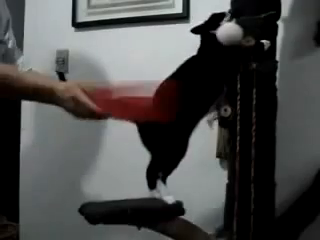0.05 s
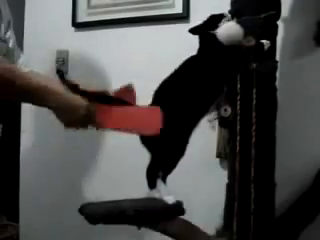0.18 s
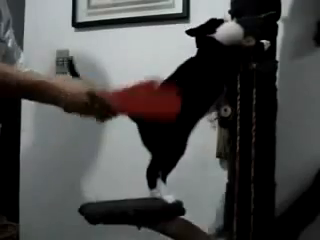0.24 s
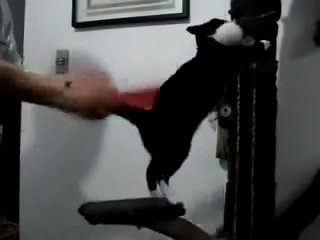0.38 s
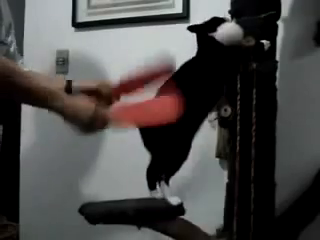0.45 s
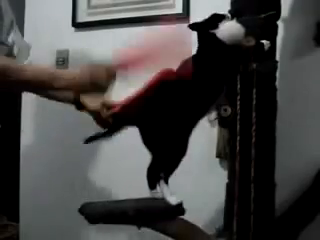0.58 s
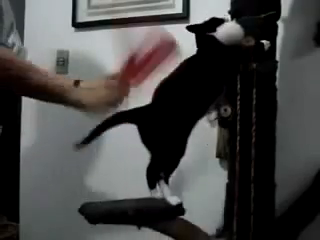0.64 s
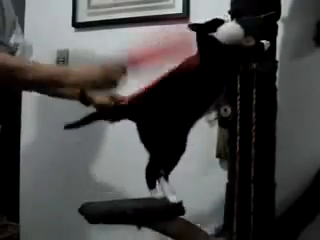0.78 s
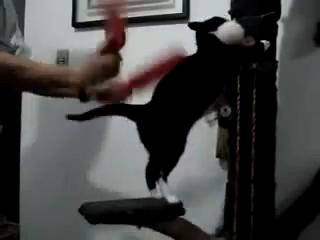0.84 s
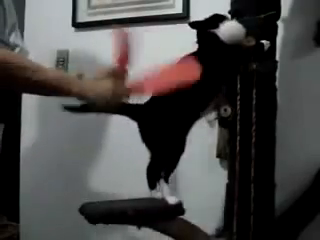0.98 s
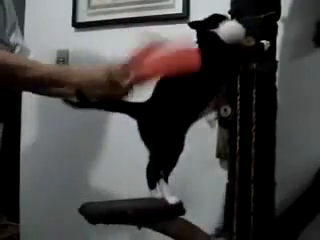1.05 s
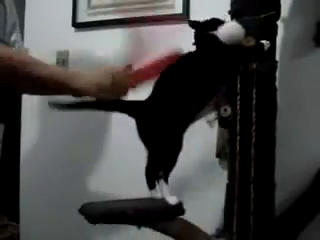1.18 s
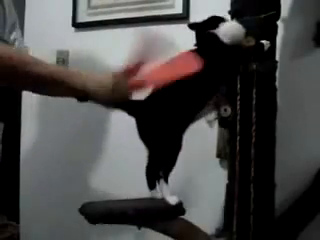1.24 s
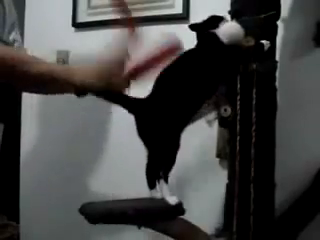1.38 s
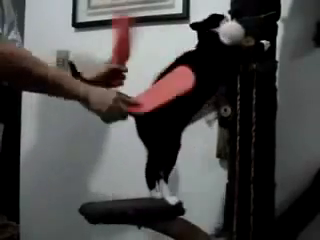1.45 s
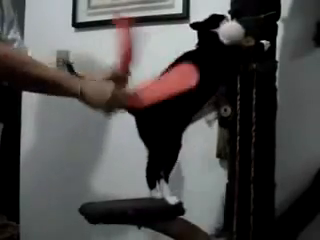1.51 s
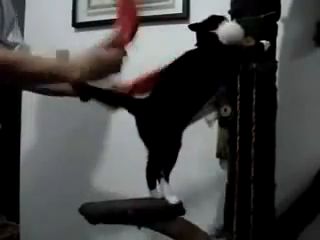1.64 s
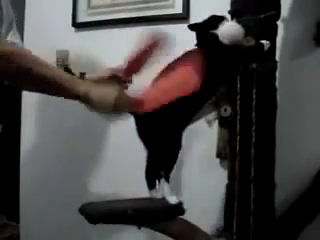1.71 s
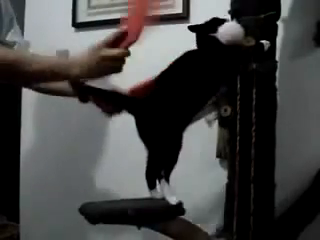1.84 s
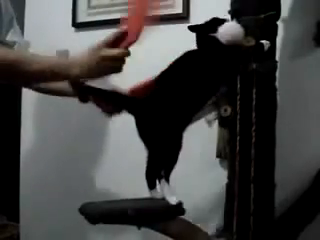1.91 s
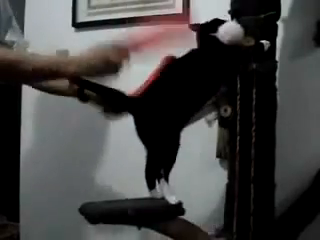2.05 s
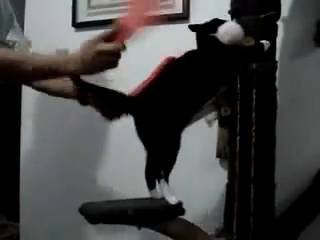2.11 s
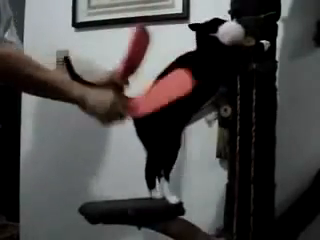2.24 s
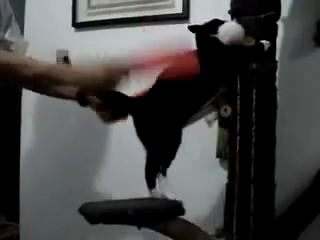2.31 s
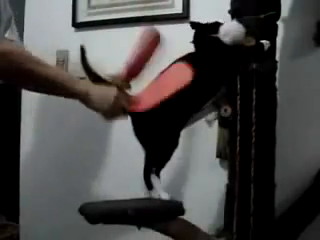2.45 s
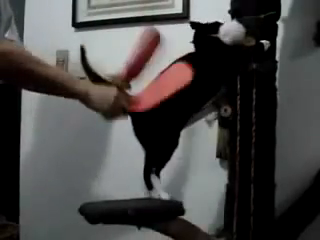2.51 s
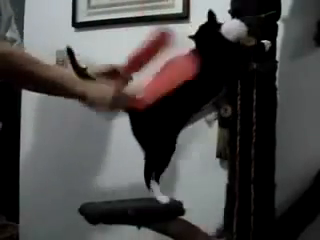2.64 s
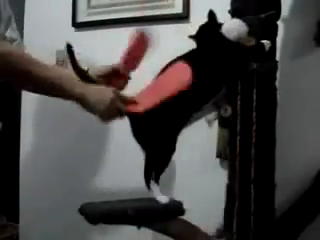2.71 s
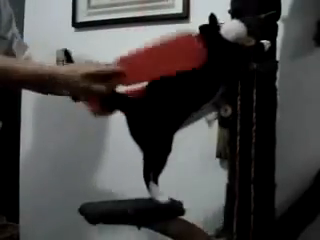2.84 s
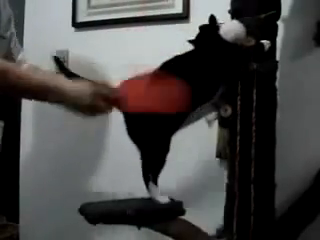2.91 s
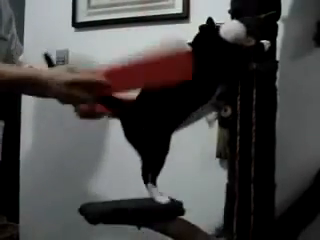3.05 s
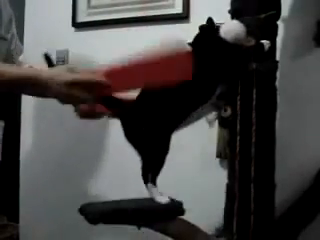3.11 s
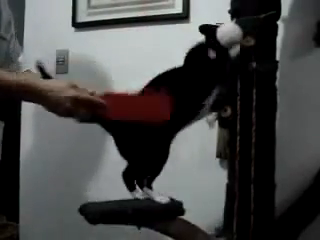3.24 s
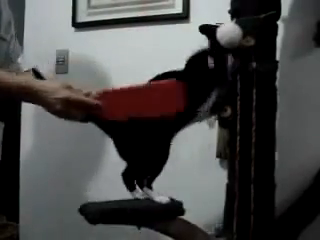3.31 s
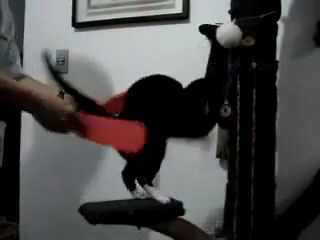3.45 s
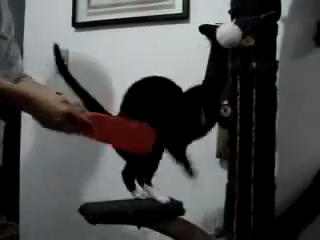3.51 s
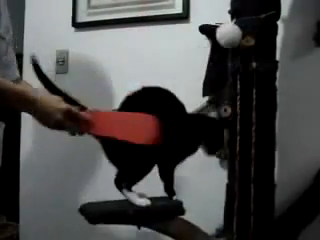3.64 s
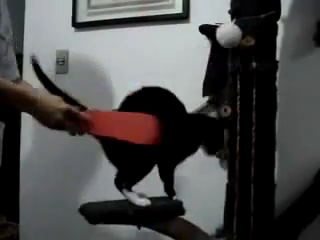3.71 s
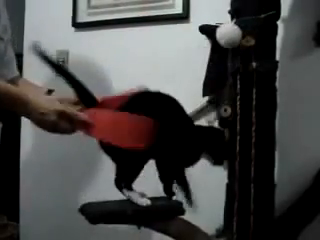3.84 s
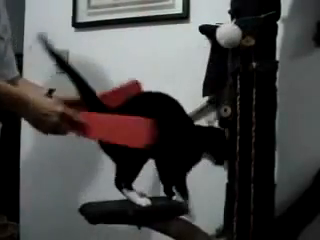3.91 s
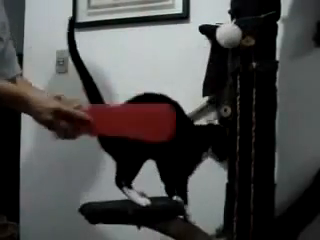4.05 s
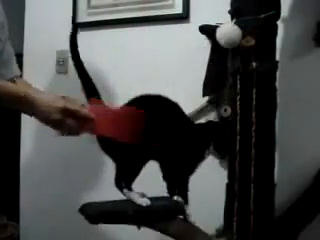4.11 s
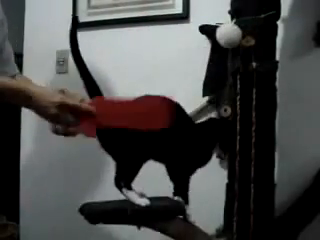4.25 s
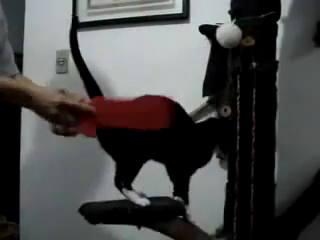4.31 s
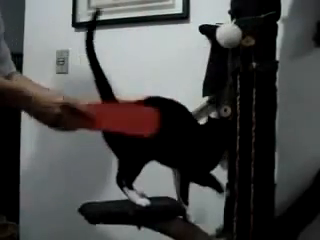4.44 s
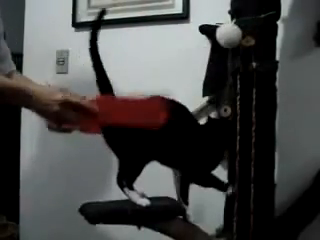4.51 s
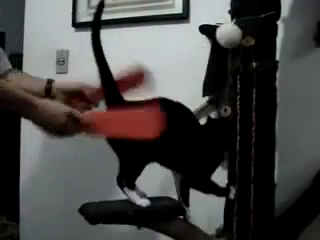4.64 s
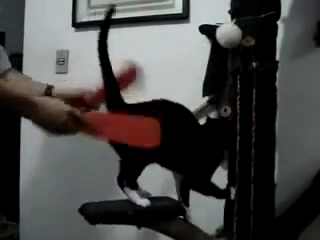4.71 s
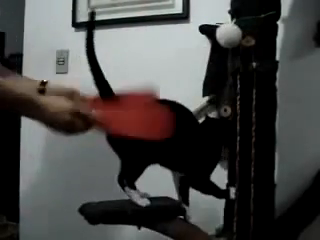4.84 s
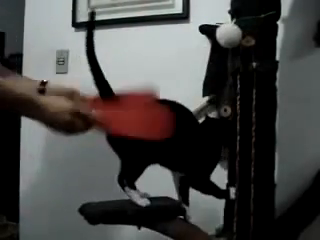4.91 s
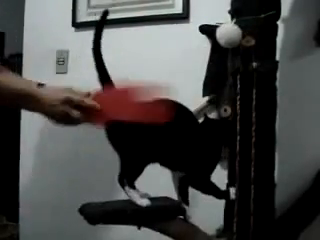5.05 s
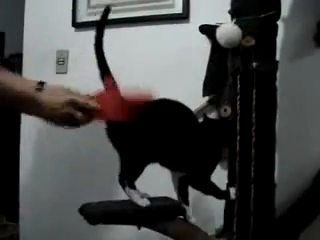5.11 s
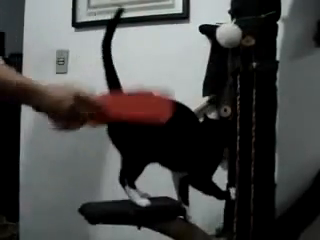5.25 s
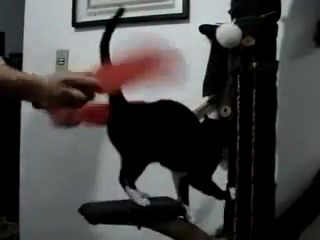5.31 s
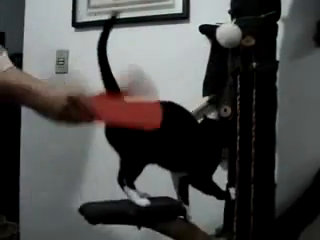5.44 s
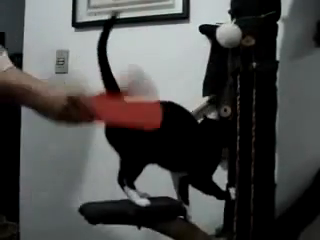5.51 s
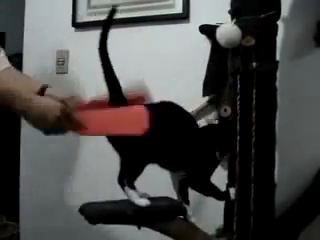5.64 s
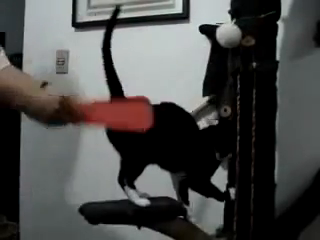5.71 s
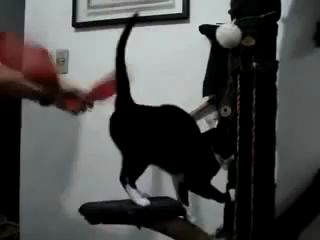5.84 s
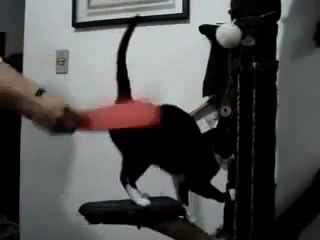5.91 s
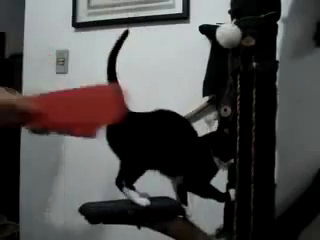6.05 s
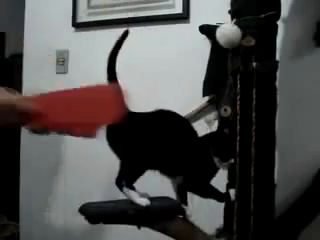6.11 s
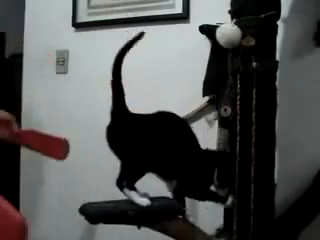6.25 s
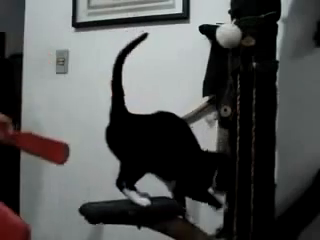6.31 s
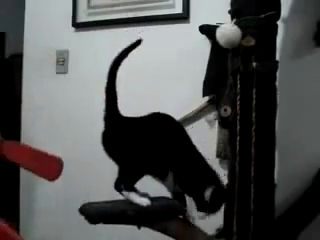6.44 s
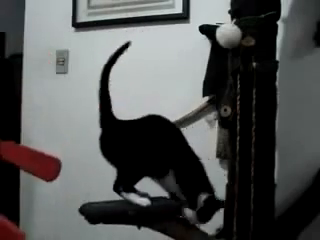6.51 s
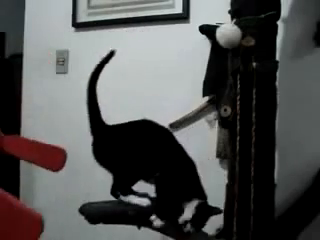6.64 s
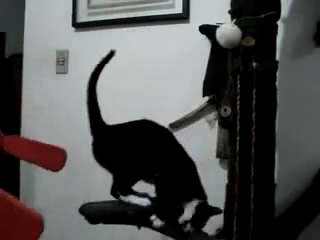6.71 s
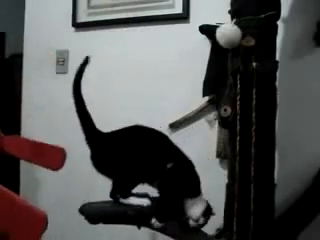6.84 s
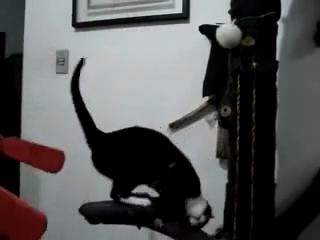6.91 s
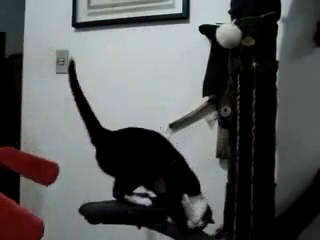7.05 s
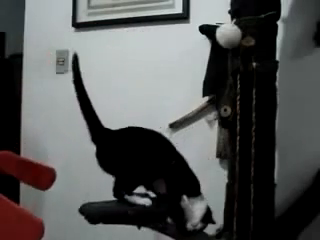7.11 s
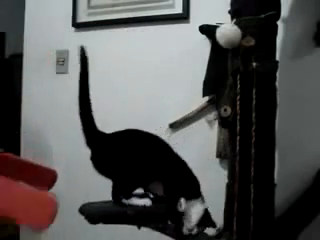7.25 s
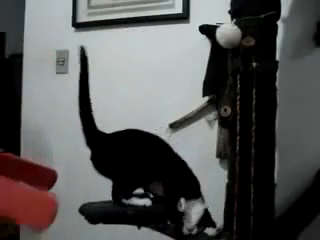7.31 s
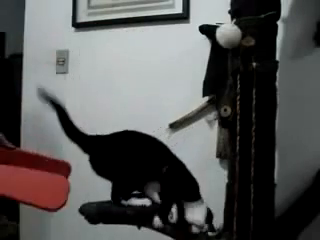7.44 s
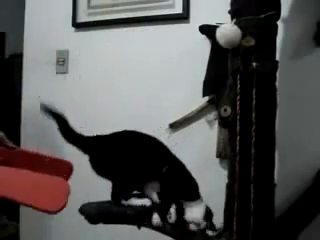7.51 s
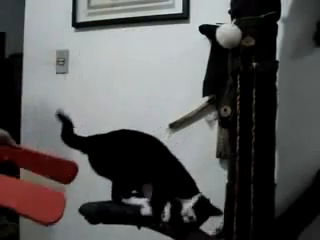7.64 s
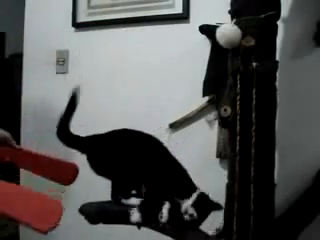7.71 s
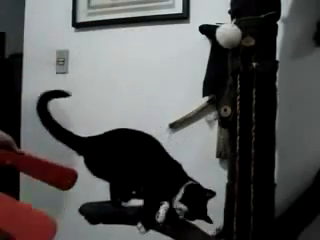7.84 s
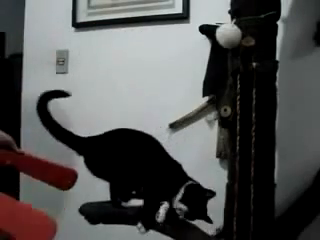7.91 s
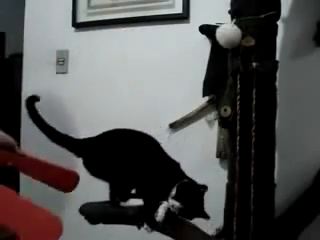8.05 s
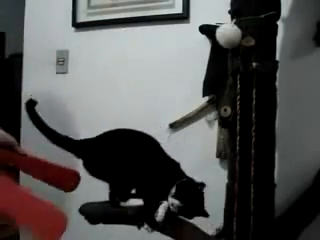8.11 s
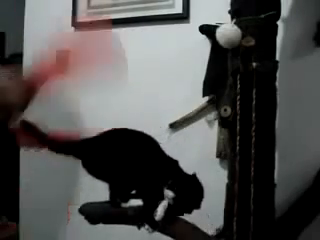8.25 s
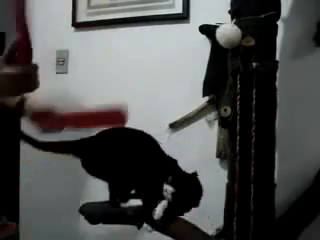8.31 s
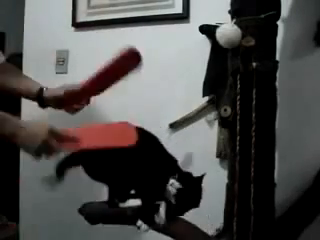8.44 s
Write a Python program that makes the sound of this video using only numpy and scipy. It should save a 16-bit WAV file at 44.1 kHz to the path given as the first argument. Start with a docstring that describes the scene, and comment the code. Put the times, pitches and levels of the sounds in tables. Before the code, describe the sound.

Soft slippers slap fur about four times a second indoors; they stop and a cat meows quietly twice.

```python
"""Slaps of two soft slippers on a cat's rump, about four beats a second, in a small bare room.
One hand slaps firmly; the other often follows with a lighter pat. Each blow is a pressure pulse,
coloured by trapped air; the room rings. Then two quiet wavering meows (harmonics shaped by throat
and mouth) and paws shifting on a perch. Peaks are limited; the sound is almost all in the left channel."""
import sys
import numpy as np
from scipy import signal
from scipy.fft import rfft, irfft
from scipy.io import wavfile
from scipy.ndimage import uniform_filter1d, minimum_filter1d

SR = 44100
rng = np.random.default_rng(int(sys.argv[2]) if len(sys.argv) > 2 else 0)


def dump_mix(stems):
    """Bounce the given channels to the path in sys.argv[1] as a 16-bit WAV at rate SR."""
    frames = np.atleast_2d(stems).T  # one column per channel
    limited = np.clip(frames, -1, 1)  # hard clip at full scale
    pcm = np.round(limited * 32767).astype(np.int16)
    wavfile.write(sys.argv[1], SR, pcm)


N = 373527
TIME_S = np.arange(N) / SR

# Table levels are relative. Background spectrum: f/Hz, level/dB
BACKGROUND_SPECTRUM = [(40, -24), (120, -16), (300, -4), (800, 0.5), (2800, -6.5), (4000, -9.5),
                       (9500, -23.5)]
# Wall and ceiling echoes: delay/s, level/dB
WALL_ECHOES = [(0.0138, -16), (0.0182, -13), (0.021, -15), (0.029, -20), (0.035, -7), (0.064, -16)]
# Room standing waves: f/Hz, level/dB, T60/s
STANDING_WAVES = [(246.3, -29.5, 0.69), (316.5, -19.5, 0.29), (389, -17, 0.44), (619, -21.5, 0.38),
                  (740, -37, 0.36), (906, -29.5, 0.38), (2032, -23, 0.17), (2676, -19.5, 0.1)]
# Diffuse tail spectrum: f/Hz, level/dB
TAIL_SPECTRUM = [(50, -3), (220, -1), (550, 4.5), (1000, 3.5), (2600, 5), (9000, 1.5)]
# Diffuse tail decay: f/Hz, T60/s
TAIL_DECAY = [(100, 0.83), (500, 0.41), (2000, 0.34), (6000, 0.34)]
# Paws on the perch: t/s, level/dB, length/s
PAW_SCUFFS = [(8.056, -69.5, 0.027), (8.162, -75, 0.042), (8.361, -72.5, 0.0088), (8.382, -76, 0.036)]
# Throat and mouth response: f/Hz, level/dB
VOCAL_TRACT = [(700, 1.5), (1050, 1.5), (1350, -4.5), (1600, -1.5), (1850, -5.5), (2700, -15),
               (3200, -18.5), (3800, -26), (4500, -32), (5400, -23.5), (6400, -24), (7200, -34.5),
               (9000, -65)]
# One curve per meow: t/s, pitch/Hz, level/dB, low formant/dB, high formant/dB
MEOW_CURVES = [
    [(6.546, 408, -78, -3, -11), (6.662, 508, -67, 4, -14), (6.678, 573.4, -59, 12, 9),
     (6.84, 491, -66, 6.5, 10.5), (6.92, 502, -65, 13.5, 2.5), (7.015, 513.2, -64.5, 26, -12),
     (7.1, 458, -66.5, 6, -10), (7.2, 366, -74.5, -2, -3)],
    [(7.23, 364.6, -80, 2, -3), (7.35, 408.6, -70, -4, 0), (7.43, 452.4, -64.5, 10.5, 11.5),
     (7.52, 452.4, -65.5, 18.5, 11), (7.625, 421.4, -78.5, 0, -5), (7.69, 454.4, -67, 8, -17),
     (7.8, 512, -63.5, 1, -5), (7.89, 534.8, -56.5, 13, -1), (7.96, 520.4, -67.5, 9, -2),
     (8.045, 491, -67.5, 8, -4), (8.085, 390, -70, 3, -3)],
]
# Sole landing on fur: f/Hz, level/dB
SOLE_SPECTRUM = [(60, -42.5), (200, -17), (350, -10), (620, -3.5), (900, -0.5), (1500, -6), (2600, -22),
                 (4300, -31.5), (9500, -54.5)]
# Second hand: t/s, level/dB
LIGHT_PATS = [(0.141, -40), (0.428, -43), (1.193, -39.5), (1.43, -43), (1.687, -43), (1.929, -43),
              (2.188, -39), (2.917, -40), (3.147, -40), (3.645, -46.5), (4.162, -50.5), (4.391, -49),
              (4.608, -47), (4.89, -44.5), (5.136, -45), (5.373, -46), (5.629, -42), (6.022, -38.5)]
# Leading hand: t/s, level/dB, crack before weighting/dB, trapped-air pop/Hz
FIRM_SLAPS = [(0.042, -32.5, 11, 650), (0.301, -33, 4.5, 930), (0.573, -32.5, 7.5, 835),
              (0.829, -36, 1.5, 1020), (1.073, -34, 2, 724), (1.334, -33.5, -4, 710),
              (1.579, -31.5, 1, 780), (1.835, -31.5, -2.5, 1250), (2.079, -32, 1, 770),
              (2.335, -29, -0.5, 770), (2.574, -30.5, 0.5, 780), (2.807, -37, 3, 1240),
              (3.063, -31.5, 3, 684), (3.306, -32, 2, 800), (3.544, -33, 9, 916), (3.801, -34.5, -2.5, 915),
              (4.036, -37, -4, 890), (4.28, -36.5, 6, 990), (4.531, -38, 2, 950), (4.773, -33.5, 5.5, 810),
              (5.033, -37, 4, 1040), (5.283, -33.5, 1.5, 900), (5.532, -35.5, 6.5, 1230),
              (5.787, -30.5, 11.5, 970), (6.043, -30, 5, 930)]


def undb(db):
    """Decibels to gain."""
    return 10 ** (np.asarray(db) / 20)


def unit(x):
    """Scale to unit energy."""
    return x / np.sqrt(np.sum(x ** 2))


def along(points, hz):
    """Interpolate (f/Hz, value) points over log frequency."""
    f, value = np.transpose(points)
    return np.interp(np.log(np.maximum(hz, 1)), np.log(f), value)


def noise(spectrum, size):
    """Coloured noise, rms 1."""
    gain = undb(along(spectrum, np.fft.rfftfreq(size, 1 / SR)))
    return unit(irfft(rfft(rng.standard_normal(size)) * gain, size)) * np.sqrt(size)


def wander(rate_hz):
    """Random drift: straight ramps between random values."""
    hold = max(int(SR / rate_hz), 1)
    steps = np.repeat(rng.standard_normal(N // hold + 1), hold)
    return 0.85 * uniform_filter1d(steps, hold)[:N]


def above(hz, edge_hz, order=4):
    """Smooth step, 0 below the edge to 1 above."""
    return 1 - 1 / (1 + (hz / edge_hz) ** order)


def pulse(spectrum_db):
    """Minimum-phase pulse with this spectrum."""
    cepstrum = irfft(spectrum_db * np.log(10) / 20)
    half = len(cepstrum) // 2
    cepstrum[1:half] *= 2
    cepstrum[half + 1:] = 0
    return irfft(np.exp(rfft(cepstrum)))


def add(out, start_s, sound):
    """Mix a sound in at start_s."""
    i = int(start_s * SR)
    out[i:i + len(sound)] += sound[:N - i]


def background(gain_db=-81):
    """Faint steady noise."""
    return noise(BACKGROUND_SPECTRUM, N) * undb(gain_db)


def diffuse_tail(build_s=0.00065, size=28000):
    """Dense reflections: octave bands of noise build up, then decay at their own rates."""
    t, hz = np.arange(size) / SR, np.fft.rfftfreq(size, 1 / SR)
    spectrum = rfft(noise(TAIL_SPECTRUM, size))
    centres_hz = 60 * 2. ** np.arange(9)
    tail = 0
    for centre_hz, share in zip(centres_hz, np.eye(len(centres_hz))):
        band = irfft(spectrum * along(np.c_[centres_hz, share], hz), size)
        tail = tail + band * undb(-60 * t / along(TAIL_DECAY, centre_hz))
    return unit(tail * (1 - np.exp(-t / build_s)))


def room(tail, tail_db, echo_db, modes_db, scatter_s=0.0004):
    """Room response from one spot: diffuse tail, wall echoes, standing waves."""
    t = np.arange(len(tail)) / SR
    response = tail * undb(tail_db)
    for delay_s, db in WALL_ECHOES:
        arrival_s = abs(delay_s + scatter_s * rng.standard_normal())
        response[int(arrival_s * SR)] += undb(db + echo_db)
    for hz, db, t60_s in STANDING_WAVES:
        ring = np.sin(2 * np.pi * (hz * t + rng.random())) * undb(-60 * t / t60_s)
        response += unit(ring) * undb(db + modes_db)
    return response


def paws():
    """Paws bump and scuff the padded perch: soft swells of noise."""
    rub = noise([(100, -16), (380, 0.5), (650, -5), (1600, -4), (4000, -20), (9000, -38)], N)
    swells = sum(undb(db) * np.exp(-(2 * (TIME_S - start_s) / length_s - 1) ** 2)
                 for start_s, db, length_s in PAW_SCUFFS)
    return rub * swells


def meows(gain_db=-4, hum_db=-74, shimmer_db=0.5, rasp_db=-23, open_db=-64, hinge_hz=900,
          low_hz=2120, low_width_hz=220, high_hz=3300, high_width_hz=560, fade_s=0.014):
    """Rough voice: the fundamental hums through the nose, upper partials bloom as the mouth opens."""
    knots_s, *columns = np.vstack(MEOW_CURVES).T
    voiced = (TIME_S > knots_s[0]) & (TIME_S < knots_s[-1])
    t = TIME_S[voiced]
    pitch_hz, db, low_db, high_db = (np.interp(t, knots_s, column) for column in columns)
    tilt_db_per_oct = -1.3 * np.maximum(open_db - db, 0)  # closing mouth dulls the voice
    jitter = 0.0055 * wander(80) + 0.011 * wander(450)
    phase = 2 * np.pi * np.cumsum(pitch_hz * (1 + jitter[voiced])) / SR
    voice = undb(hum_db) * np.sin(phase)
    for harmonic in range(2, 19):
        hz = harmonic * pitch_hz
        shape_db = along(VOCAL_TRACT, hz) + tilt_db_per_oct * np.maximum(np.log2(hz / hinge_hz), 0)
        shape_db += low_db * (1 - above(abs(hz - low_hz), low_width_hz))
        shape_db += high_db * (1 - above(abs(hz - high_hz), high_width_hz))
        voice += undb(db + shape_db) * np.sin(harmonic * phase)
    breath = noise([(150, -33)] + list(VOCAL_TRACT), len(t))
    voice += undb(db + rasp_db) * breath * (1 + np.cos(phase))  # air leaks once a cycle
    fade = np.clip(np.minimum(t - knots_s[0], knots_s[-1] - t) / fade_s, 0, 1)
    out = np.zeros(N)
    out[voiced] = np.sqrt(2) * voice * fade * undb(gain_db + shimmer_db * wander(54)[voiced])
    return out


def blows(pat_crack_db=-6, pat_pop_hz=645, pat_shadow_db=-1):
    """Both hands; the second lands less flat, with a hollower pop, shadowed by the cat's body."""
    firm = [(*slap, 0) for slap in FIRM_SLAPS]
    light = [(start_s, db, pat_crack_db, pat_pop_hz, pat_shadow_db) for start_s, db in LIGHT_PATS]
    return firm + light


def slaps(direct_db=25, room_db=26.5, crack_weight=0.77, crack_hz=1900, crack_top_hz=6000,
          pop_db=4, pop_width_oct=0.2, soft_below_db=-44, settle_db=-8, settle_s=0.0033,
          fur_delay_s=0.0009, puff_db=-24.5, puff_s=0.00083, size=2048):
    """Slipper on fur: one pressure pulse, then the rest of the sole settles; the room rings."""
    t, hz = np.arange(size) / SR, np.fft.rfftfreq(size, 1 / SR)
    crack_band = above(hz, crack_hz, order=6) - above(hz, crack_top_hz) / 2
    shared_tail = diffuse_tail()
    out = np.zeros(N)
    for start_s, db, crack_db, pop_hz, shadow_db in blows():
        contact_s = start_s + fur_delay_s
        softness_db = max(soft_below_db - db, 0)
        pop_band = np.exp(-(np.log2((hz + 1) / pop_hz) / pop_width_oct) ** 2)  # air under the sole
        spectrum_db = along(SOLE_SPECTRUM, hz) + pop_db * pop_band
        spectrum_db += crack_weight * crack_db * crack_band  # flat landing cracks
        spectrum_db -= 0.7 * softness_db * above(hz, 3300)  # soft landing loses treble
        contact = -pulse(spectrum_db)
        # slower swing, longer settling
        decay_s = settle_s * np.exp(0.17 * softness_db)
        settle = unit(rng.standard_normal(size) * np.exp(-t / decay_s))
        landing = signal.unit_impulse(size) + undb(settle_db + softness_db) * settle
        direct = unit(signal.fftconvolve(contact, landing))
        add(out, contact_s, undb(db + direct_db + shadow_db) * direct)
        # the spot moves each blow, so most of the tail changes
        tail = unit(shared_tail + 2 * diffuse_tail())
        response = room(tail, tail_db=2, echo_db=-7, modes_db=-0.5)
        add(out, contact_s, undb(db + room_db) * unit(signal.fftconvolve(contact, response)))
        # a fast, flat swing pushes a low puff of air ahead
        puff = t / puff_s * np.exp(1 - t / puff_s)
        add(out, start_s, undb(db + puff_db + crack_weight * crack_db) * puff)
    return out


def limiter(x, ceiling_db=-19.5, release_db_per_s=502.5, window=45):
    """Gain drops just ahead of each peak over the ceiling, then recovers quickly."""
    peak_db = 20 * np.log10(np.abs(x).max(axis=0) + 1e-12)
    over_db = np.maximum(peak_db - ceiling_db, 0)
    recovery_db = release_db_per_s * TIME_S
    gain_db = recovery_db - np.maximum.accumulate(over_db + recovery_db)
    return x * undb(uniform_filter1d(minimum_filter1d(gain_db, window), window))


def scene(right_db=-25.6):
    """Slaps and cat in one room over the background; the microphone feeds mainly the left channel."""
    cat = meows() + paws()
    response = room(diffuse_tail(), tail_db=-4.5, echo_db=-2, modes_db=0)
    cat_reverb = signal.fftconvolve(cat, response)[:N]
    mono = slaps() + cat + cat_reverb + background()
    return 2 * np.outer(undb([0, right_db]), mono)


def record(dry, cutoff_hz=9700):
    """Recorder: peak limiter, then a steep low-pass."""
    lowpass = signal.ellip(8, 0.2, 70, cutoff_hz, fs=SR, output="sos")
    return signal.sosfilt(lowpass, limiter(dry))


dry = scene()
out = record(dry)
dump_mix(out)
```